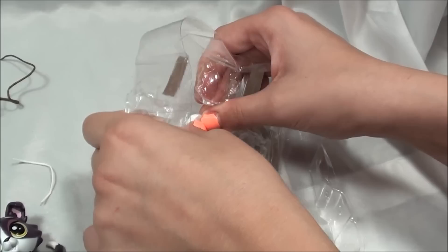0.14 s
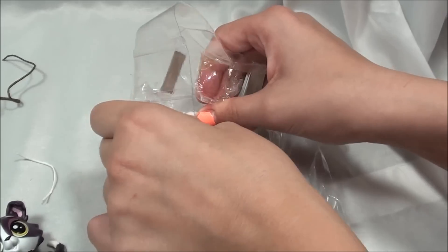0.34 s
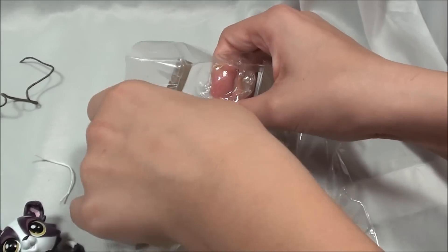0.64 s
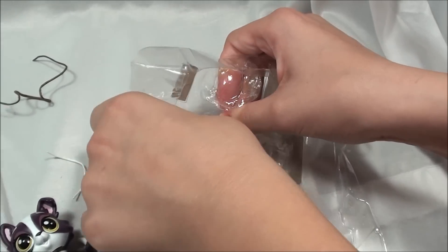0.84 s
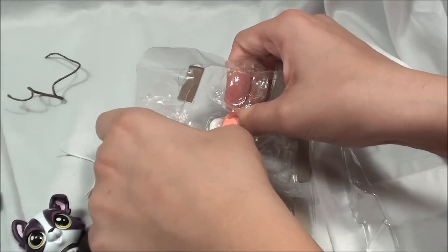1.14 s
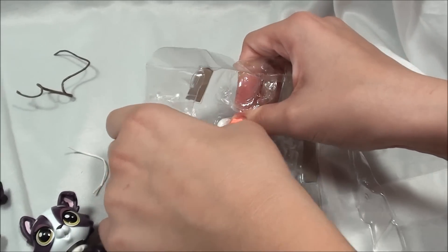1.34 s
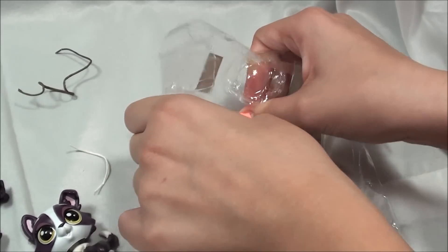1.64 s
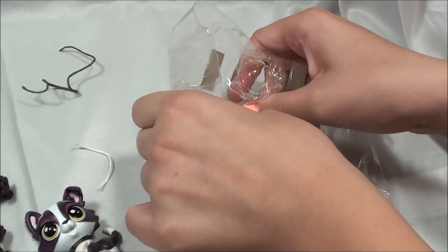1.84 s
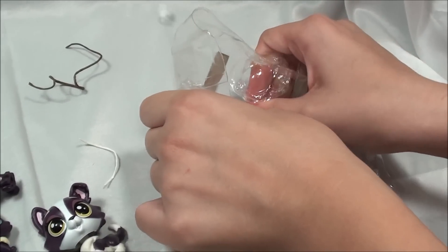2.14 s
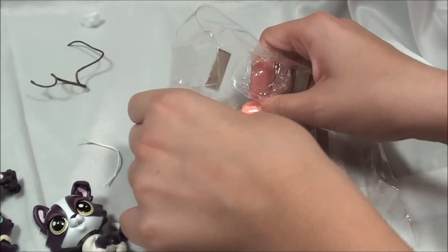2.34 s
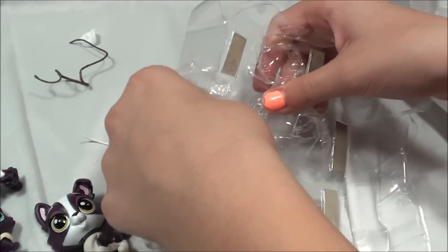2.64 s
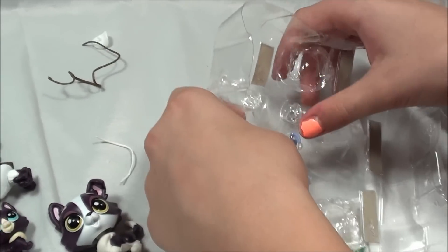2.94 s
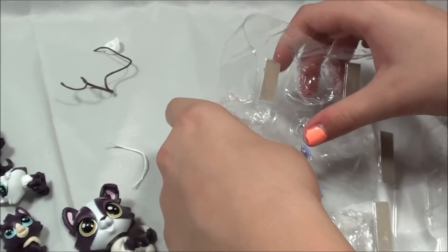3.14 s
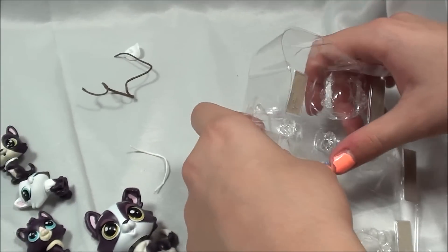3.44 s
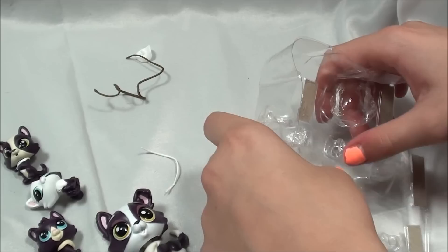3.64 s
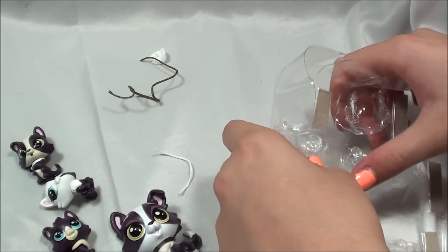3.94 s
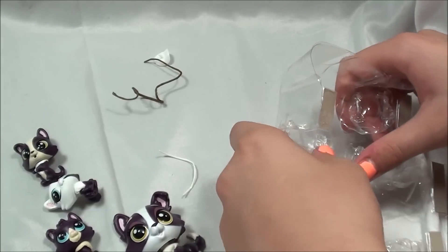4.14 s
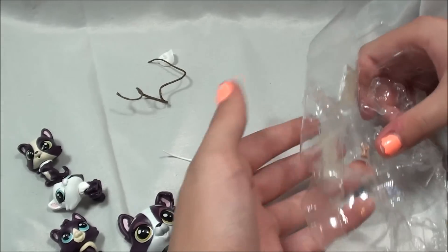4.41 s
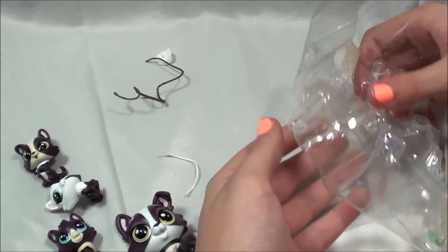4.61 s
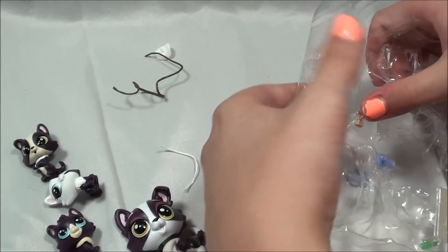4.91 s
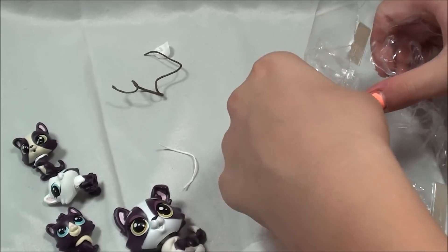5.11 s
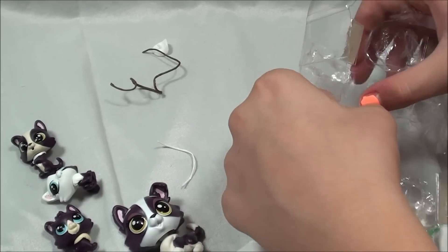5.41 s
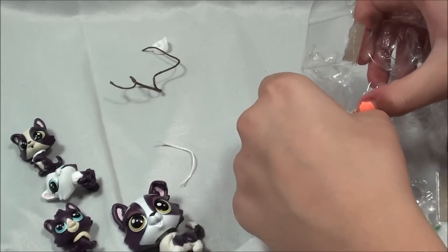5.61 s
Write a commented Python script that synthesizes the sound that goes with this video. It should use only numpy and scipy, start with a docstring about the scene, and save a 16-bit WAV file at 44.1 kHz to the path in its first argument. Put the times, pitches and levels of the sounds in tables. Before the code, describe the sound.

Hands handle a thin moulded plastic tray close to the microphone. It opens at once with a crisp crinkle, then irregular dry snaps, several per tenth of a second, bright and thin, mixed with hollow mid-pitched pops as cup walls flip. A short low creak of finger on taut plastic comes at 0.1-0.2 s, another at 1.6-1.75, a faster one at 2.2-2.3. Snapping eases a little around 1.1-1.3, then is dense and loud from 1.5 to 2.85, with strong pops near 2.5 and 2.65. From 2.9 to 4.3 only sparse clicks and soft rustle remain, one sharp snap at 3.14. At 4.35-4.5 a loud cluster of pops and crunch ends with a dull cloth-muffled bump. Near quiet follows, with a soft knock at 5.17, then small bright ticks from 5.5 to the end. Room echo is faint; steady low air, hiss and weak mains hum lie beneath.

```python
"""Small items worked out of a plastic tray

Hands work items out of a thin moulded tray indoors: noise bursts make the snapping creases, popping cups
and bumps on a cloth-covered table. A sliding finger creaks as uneven slips ring the taut wall, and tiny
noise grains rustle between. Shaped noise and low sine tones make room air, microphone hiss and mains hum."""
import sys
import numpy as np
from scipy import signal
from scipy.fft import rfft, irfft, next_fast_len
from scipy.io import wavfile
from scipy.ndimage import uniform_filter1d, minimum_filter1d, map_coordinates

SR = 44100
rng = np.random.default_rng(int(sys.argv[2]) if len(sys.argv) > 2 else 0)


def master(y):
    """Save y as 16-bit WAV."""
    cut = np.clip(np.atleast_2d(y).T, -1, 1)
    pcm = np.round(cut * 32767)  # scale
    wavfile.write(sys.argv[1], SR, pcm.astype(np.int16))


def magnitude_from_level(level_db):
    """Linear magnitude for a level in decibels (20 dB per decade)."""
    exponent = np.asarray(level_db, float) / 20
    return 10 ** exponent


N = 254456
CLOCK = np.arange(N) / SR  # seconds

# creases buckling: t/s, level/dB, ring f/Hz, sizzle level relative to the crack/dB
CREASE_SNAPS = [(0.0094, -8, 6790, -8), (0.019, -20, 4160, -10), (0.0247, -9, 6780, -1),
                (0.0293, -6.5, 5500, -16), (0.0422, -13, 5500, -9), (0.0464, -9.5, 5440, -7),
                (0.0653, -11.5, 7600, -7), (0.101, -20, 4630, -10), (0.1052, -15, 9300, -12),
                (0.1491, -16, 3920, -16), (0.158, -13, 3840, -13), (0.171, -7, 7310, -14),
                (0.176, -2.5, 7400, -21), (0.1994, -14, 5570, -15), (0.2109, -14, 3770, -3),
                (0.2289, -25, 3800, -8), (0.2443, -17, 3940, -1), (0.2563, -4, 4170, -6),
                (0.2838, -10.5, 9300, -11), (0.2939, -16, 8980, -13), (0.3062, -3, 8140, -39),
                (0.3182, 0.5, 5900, -38), (0.3726, -19, 5300, -4), (0.3945, -14, 4340, -17),
                (0.403, -13.5, 4430, -15), (0.4249, -17, 5960, -18), (0.4444, -3, 3570, -42),
                (0.4793, -15, 6870, -18), (0.5013, -18.5, 3710, 6), (0.5212, -9.5, 7950, -8),
                (0.5686, -10, 6800, 6), (0.5788, -15, 7600, -18), (0.5947, -19, 3840, -21),
                (0.6365, -27, 3620, -14), (0.6492, -14, 7750, -2), (0.6709, -1.5, 6300, -16),
                (0.6909, -8.5, 8830, -14), (0.7, -14, 9120, -15), (0.7056, -11, 8790, -7),
                (0.7133, -2, 5350, -9), (0.7382, -12.5, 6340, -7), (0.845, -12.5, 6400, -3),
                (0.8714, -2, 7100, -20), (0.8864, -24, 4060, -18), (0.9088, -19.5, 3160, -17),
                (0.9412, -15.5, 3730, -19), (0.9453, -12, 8650, -13), (0.9524, -17, 3280, -14),
                (1.0021, -16, 4380, -11), (1.0224, -17.5, 4330, -16), (1.049, -22, 8900, -18),
                (1.062, -11.5, 3320, -27), (1.0834, -5.5, 8100, -14), (1.1707, -10.5, 7200, -15),
                (1.2096, -18.5, 3840, -29), (1.2965, -10, 3780, -9), (1.2994, -7, 4180, -21),
                (1.3067, -12, 3720, -25), (1.3428, -10.5, 4930, -22), (1.3743, -15.5, 8140, -18),
                (1.3992, -11, 4750, -17), (1.4213, -15.5, 3220, -12), (1.4571, -10, 6250, -4),
                (1.4885, -13.5, 8600, -25), (1.5065, -20, 8750, -21), (1.5189, -1, 3560, -7),
                (1.5359, -5, 3500, -20), (1.5633, 0, 4020, -31), (1.5874, -17, 7520, -8),
                (1.6327, -13.5, 8240, -4), (1.6506, -7, 8640, 0), (1.7175, -14, 5960, -23),
                (1.7462, -10, 8100, -19), (1.7684, -7.5, 3980, -18), (1.782, -9.5, 4240, -23),
                (1.7913, -12, 3560, -16), (1.8103, -10.5, 4400, -18), (1.8267, -12, 5170, -20),
                (1.833, -17, 5200, -17), (1.8462, -7.5, 5010, -15), (1.8856, -6, 4400, -2.5),
                (1.8984, -10.5, 3400, -15), (1.91, -14.5, 9000, -12), (1.9197, -6.5, 4200, -19),
                (1.945, -21, 7900, -4), (1.9744, -11, 3260, -19), (1.9846, -10.5, 5290, -17),
                (2.0073, -6.5, 7140, -20), (2.0218, -13, 7090, -18), (2.0657, -1, 6500, -18),
                (2.0916, -15, 4310, -17), (2.1151, -8, 5460, -10), (2.1301, 1, 8300, -17),
                (2.146, -2.5, 6530, -17), (2.173, -12, 6700, -22), (2.1829, -9.5, 6900, -15),
                (2.1944, -17, 7850, -18), (2.1994, -18, 4120, -8), (2.2228, -6, 2870, 4.5),
                (2.2712, -13.5, 3620, 3), (2.3336, -22, 4260, -21), (2.3835, -13, 3010, -22),
                (2.393, -9.5, 7300, -20), (2.4034, -12, 8080, -16), (2.4269, -14, 3500, -18),
                (2.4454, -6, 7300, -13), (2.4553, -2.5, 7100, -19), (2.4777, -9, 7660, -3),
                (2.4813, -2, 8460, -19), (2.4966, -9, 7150, -17), (2.5411, 0, 3800, -29),
                (2.5745, -8, 7730, -17), (2.6338, -19.5, 3940, -7), (2.6589, -2.5, 7900, -11),
                (2.6908, -15.5, 6750, -22), (2.8, -13.5, 8150, -19), (2.8305, -0.5, 6400, -15),
                (2.8374, -10.5, 7700, -14), (2.9632, -19, 3160, -4), (3.0918, -19.5, 6400, -18),
                (3.1403, -2, 5900, 0.5), (3.2061, -20, 3730, -17), (3.3877, -22.5, 3050, 3),
                (3.4077, -30, 7310, -21), (3.5927, -15.5, 3900, 0.5), (3.7223, -29.5, 4200, -8),
                (3.8521, -22.5, 3220, -26), (3.9594, -14, 5230, -14), (3.9973, -25, 7360, -11),
                (4.0054, -22, 7460, -16), (4.0726, -24.5, 3560, -19), (4.1894, -19.5, 6600, -17),
                (4.326, -26, 6520, -20), (4.3665, -12, 3490, -12), (4.3869, -1, 7300, -25),
                (4.4164, -10, 3880, -22), (4.429, -14.5, 3060, -16), (4.4558, -5, 3140, -31),
                (4.4734, -15, 4210, -23), (4.5281, -10, 5870, -16), (4.7002, -32.5, 3500, -19),
                (4.8584, -33.5, 3800, -21), (4.9873, -32.5, 8400, -20), (5.02, -37, 6690, -1),
                (5.0499, -29, 9050, -19), (5.1193, -24.5, 5950, 2), (5.1721, -22, 3630, -21),
                (5.2864, -34, 5850, -20), (5.3862, -31.5, 8300, -4), (5.4989, -17, 9400, -14),
                (5.5184, -22, 8850, -9.5), (5.5298, -23.5, 8900, -13), (5.5602, -17, 6820, -9),
                (5.5672, -15.5, 8500, -18), (5.6138, -24.5, 8700, -9), (5.6554, -19.5, 8700, -14),
                (5.673, -23, 7200, -14), (5.684, -21.5, 8730, -14), (5.7049, -12.5, 2930, -12),
                (5.7172, -12.5, 6350, -21), (5.7402, -23, 3290, -9), (5.758, -27, 8850, -14)]
# hollow cups flipping: t/s, level before trims/dB, ring f/Hz
CUP_POPS = [(0.009, -10, 1870), (0.028, -24, 2010), (0.046, -22, 1950), (0.101, -20, 1850),
            (0.125, -21, 1250), (0.148, -21, 2010), (0.209, -4, 1430), (0.257, -16.5, 1500),
            (0.284, -26, 1680), (0.319, -13, 1650), (0.445, -7, 876), (0.467, -18.5, 864),
            (0.601, -15.5, 830), (0.616, -5.5, 1350), (0.636, -11.5, 890), (0.667, -15.5, 1850),
            (0.671, -18, 1530), (0.696, -20, 2440), (0.842, -21, 2580), (0.871, -19.5, 1980),
            (0.886, -20.5, 2460), (1.002, -23.5, 1670), (1.061, -24, 1470), (1.084, -20.5, 1235),
            (1.167, -13.5, 1600), (1.176, -9.5, 1610), (1.211, -23.5, 1830), (1.299, -9.5, 1480),
            (1.342, -22, 2580), (1.398, -17, 2380), (1.421, -25.5, 1770), (1.456, -18.5, 1800),
            (1.488, -16.5, 2120), (1.519, -15, 2600), (1.563, -17, 2680), (1.718, -24, 1600),
            (1.767, -20, 1500), (1.783, -15, 733), (1.827, -10, 1560), (1.858, -24, 720),
            (1.885, -16.5, 1600), (1.893, -18, 714), (1.923, -25, 1510), (1.974, -21, 1600),
            (2.007, -19.5, 1700), (2.097, -22.5, 845), (2.126, -11.5, 1490), (2.147, -14.5, 2100),
            (2.183, -19.5, 660), (2.202, -16.5, 2060), (2.223, -9, 1490), (2.307, -19, 1730),
            (2.333, -25, 2140), (2.373, -19, 1460), (2.383, -20, 2570), (2.392, -15.5, 2510),
            (2.434, -21, 2610), (2.482, -15, 1230), (2.496, -6, 653), (2.54, -3.5, 2800),
            (2.581, -12, 1480), (2.659, -5.5, 2720), (2.69, -22, 2270), (2.837, -9, 1430),
            (2.962, -25.5, 2630), (3.15, -14.5, 703), (3.174, -25, 1080), (3.206, -23, 1710),
            (3.228, -29, 1310), (3.356, -31, 2060), (3.388, -24, 1430), (3.593, -25, 2300),
            (3.705, -35.5, 905), (3.853, -28.5, 2000), (3.958, -27.5, 2330), (4.01, -25.5, 1970),
            (4.072, -21.5, 886), (4.188, -27, 2030), (4.236, -33, 2110), (4.366, -11.5, 2020),
            (4.387, -3.5, 2540), (4.411, -7.5, 2580), (4.44, -4.5, 1960), (4.45, -11, 1800),
            (4.461, -3, 1400), (5.045, -38, 573), (5.221, -31.5, 2050), (5.337, -32, 1870),
            (5.568, -26, 1980), (5.663, -31, 2690), (5.704, -16, 2640), (5.716, -24, 2270),
            (5.742, -32, 1570)]


def snaps():
    """Each crease lets go at once: a dry crack, strongest where that facet rings, and a thin sizzle."""
    s, db, ring_hz, sizzle_db = np.transpose(CREASE_SNAPS)
    # a fixed time plus 37 cycles of the ring, to fall by 60 dB
    t60 = np.clip(0.0044 + 37 / ring_hz, 0.003, 0.09)

    def crack_colour(hz):
        return hump(hz, ring_hz[:, None], 0.26) + 0.71 * hump(hz, 5120, 0.48)

    def sizzle_colour(hz):
        return hump(hz, 8700, 0.5)

    crack = bursts(s, db, t60, crack_colour, rise_s=0.0003, size=3072)
    sizzle = bursts(s, db + sizzle_db, 0.18 * t60, sizzle_colour, rise_s=0.00021, size=2048)
    return crack + sizzle


def pops():
    """A cup wall flips over: big cups ring clearly, small ones less purely and weaker; the lowest notes are cut
    away."""
    s, db, ring_hz = np.transpose(CUP_POPS)
    t60 = np.clip(0.0051 + 35 / ring_hz, 0.006, 0.12)
    small = np.clip(np.log2(ring_hz / 900), 0, 2)  # octaves of ring above a big cup

    def ring_colour(hz):
        return hump(hz, ring_hz[:, None], (0.06 + 0.04 * small)[:, None])

    def slap_colour(hz):
        return hump(hz, np.sqrt(1600 * ring_hz)[:, None], 0.71)

    ring = bursts(s, db - 3.5 - 1.2 * small, t60, ring_colour, rise_s=0.0006, size=4096)
    slap = bursts(s, db - 3.5, np.full(len(s), 0.028), slap_colour, rise_s=0.00046, size=4096)
    # three gentle bass cuts in a row
    return filtered(ring + slap, lambda hz: (1j * hz / (1j * hz + 330)) ** 3)


def bumps():
    """The tray meets the table, and cloth softens the contact: a dull low knock."""
    # knocks on the table: t/s, level/dB, f/Hz
    knocks = [(0.209, -41, 234), (0.337, -35.5, 150), (0.447, -44, 140), (0.879, -39, 252),
              (2.378, -43, 180), (2.54, -39, 168), (2.658, -38, 262), (3.084, -46, 200), (3.152, -35, 473),
              (4.384, -43, 243), (4.462, -29.5, 320), (4.469, -31.5, 135), (4.502, -31, 260),
              (5.171, -30.5, 394), (5.181, -38.5, 197), (5.496, -41, 348)]
    s, db, knock_hz = np.transpose(knocks)

    def knock_colour(hz):
        return hump(hz, knock_hz[:, None], 0.29)

    return bursts(s, db, np.full(len(s), 0.09), knock_colour, rise_s=0.0055, size=4096)


def creak():
    """A finger sticks and slips on taut plastic at an uneven rate; every slip rings the wall."""
    # one list of points per slide: t/s, relative level/dB, rate/slips per s
    slides = [
        [(.085, -61, 70), (.14, -34.5, 136), (.205, -40, 150)],
        [(1.61, -37, 110), (1.7, -45.5, 106), (1.755, -36, 160)],
        [(2.185, -35, 230), (2.25, -37, 310), (2.32, -39.5, 196)],
    ]
    # resonances of the taut wall: f/Hz, width/Hz, relative level/dB
    resonances = [(1620, 380, 3), (3780, 3500, -4.5), (6800, 810, -16)]
    slips = np.zeros(N)
    for rows in slides:
        s, db, rate = np.transpose(rows)
        sliding = (CLOCK > s[0]) & (CLOCK < s[-1])
        speed = np.interp(CLOCK, s, rate) * sliding
        # one slip each time the running count passes a whole number
        at = np.flatnonzero(np.diff(np.floor(np.cumsum(speed) / SR)))
        chance = rng.standard_normal((len(at), 2))
        at = at + (0.08 * chance[:, 0] * SR / speed[at]).astype(int)
        strength = magnitude_from_level(np.interp(at / SR, s, db) + 1.5 * chance[:, 1])
        # fewer slips per second are each made stronger, to hold the level
        slips[at] = strength * np.sqrt(SR / np.interp(at / SR, s, rate))

    def resonance(hz, centre_hz, width_hz):
        damping = 1j * hz * width_hz
        return damping / (centre_hz * centre_hz - hz * hz + damping)

    def wall_response(hz):
        return sum(magnitude_from_level(db) * resonance(hz, centre_hz, width_hz) ** 2
                   for centre_hz, width_hz, db in resonances)

    return magnitude_from_level(15.5) * filtered(slips, wall_response)


def film_rustle():
    """Thin plastic rustles under the hands and after each snap; gentle touches hiss more and tick less."""
    # colour of the thin plastic: f/Hz, relative level/dB per Hz
    film_colour = [(1180, -7.5), (2000, -3.5), (2200, -5), (2400, -11), (4050, 5.5), (7570, -1.5),
                   (14500, -12.5), (16000, -35)]
    moved = magnitude_from_level(handling(column=1)) + crumpling(column=2)
    level = np.hypot(moved, settling(CREASE_SNAPS, under_db=-22.5, t60=0.075))
    gentle = np.clip((-36 - 20 * np.log10(level)) / 10, 0, 1)
    return level * rustle(film_colour, [2500, 13000], count=3000, t60=0.012, spread_db=3.5,
                          width=0.42, hiss=0.22 + 1.47 * gentle)


def hollow_rustle():
    """The hollow cups give a lower rustle under the hands and after each pop."""
    # colour of the hollow cups: f/Hz, relative level/dB per Hz
    hollow_colour = [(90, -13), (180, 1), (320, -7.5), (500, -7), (800, -6), (1600, -7.5), (2300, -9),
                     (3000, -13), (5000, -43)]
    moved = magnitude_from_level(handling(column=2)) + crumpling(column=3)
    level = np.hypot(moved, settling(CUP_POPS, under_db=-20, t60=0.15))
    return level * rustle(hollow_colour, [700, 2600], count=2000, t60=0.025, spread_db=3.5,
                          width=0.72, hiss=0.43)


def rustle(spectrum, span_hz, count, t60, spread_db, width, hiss):
    """Many tiny creases of unequal size, each with its own colour, over the hiss of skin on plastic."""
    draw = rng.random((count, 3))
    low, high = np.log(span_hz)
    centre_hz = np.exp(low + (high - low) * draw[:, 1:2])
    sizes_db = -spread_db * np.log(draw[:, 2] + 0.01)
    grains = bursts(draw[:, 0] * N / SR, sizes_db, np.full(count, t60),
                    lambda hz: hump(hz, centre_hz, width), rise_s=0.0003, size=512)
    # grains spread evenly on log frequency fall 3 dB an octave until levelled
    grains = unit(filtered(grains, np.sqrt))
    mixed = (grains + hiss * rng.standard_normal(N)) / np.sqrt(1 + hiss ** 2)
    return unit(filtered(mixed, lambda hz: magnitude_from_level(along(spectrum, hz))))


def handling(column):
    """Rustle level in dB as the hands move; fingers never move evenly, so it wavers at random."""
    # hand movement, before the wavering: t/s, film rustle level/dB, hollow rustle level/dB
    movement = np.transpose([(0, -46, -46), (.25, -34, -37), (.55, -45, -41.5), (.75, -36.5, -48.5),
                             (.95, -47.5, -45.5), (1.2, -45.5, -56), (1.45, -55, -58), (1.55, -40.5, -49),
                             (1.9, -47.5, -50), (2.35, -46, -45.5), (2.75, -43.5, -49.5), (3.2, -41, -48),
                             (3.5, -50, -51), (3.85, -45.5, -53.5), (4.25, -46.5, -50.5), (4.6, -52.5, -61),
                             (5.05, -53.5, -59), (5.38, -40.5, -49), (5.77, -53, -58)])
    waver_db = 2.5 * map_coordinates(rng.standard_normal(150), [25 * CLOCK])  # 25 random points a second
    return np.interp(CLOCK, movement[0], movement[column]) + waver_db


def crumpling(column):
    """A squeeze crumples a whole patch: rustle amplitude with a quick rise, a hold and a release."""
    # squeezes: start t/s, length/s, film rustle level/dB, hollow rustle level/dB
    squeezes = [(0, 0.028, -18.5, -47), (0.137, 0.24, -34, -44), (0.324, 0.054, -26.5, -35),
                (0.58, 0.11, -37, -48), (0.837, 0.14, -43.5, -53), (1.041, 0.058, -51, -42.5),
                (1.169, 0.068, -46.5, -40.5), (1.308, 0.12, -51, -45), (1.51, .07, -44, -52),
                (1.756, 0.094, -38, -42), (1.889, 0.042, -32, -30), (2.013, 0.023, -36, -39),
                (2.184, 0.13, -31, -43.5), (2.369, .14, -26.5, -45.5), (2.53, 0.14, -35, -41),
                (2.819, 0.035, -40, -38.5), (3.301, 0.045, -47, -51), (3.991, 0.028, -44, -44),
                (4.131, 0.063, -66, -49), (4.308, 0.16, -38.5, -46), (4.364, 0.046, -27.5, -28.5),
                (4.437, 0.052, -25, -23), (4.49, 0.059, -51, -46.5), (4.689, .05, -49.5, -56),
                (5.16, 0.032, -44, -39), (5.644, 0.054, -44, -64)]
    squeeze_s, let_go_s = 0.01, 0.035  # time to rise and to fall by 60 dB
    power = np.zeros(N)
    for row in squeezes:
        rise_db = 60 * np.minimum(CLOCK - row[0], 0) / squeeze_s
        fall_db = -60 * np.maximum(CLOCK - row[0] - row[1], 0) / let_go_s
        power += magnitude_from_level(np.maximum(row[column] + rise_db + fall_db, -150)) ** 2
    return np.sqrt(power)


def settling(rows, under_db, t60):
    """Rustle amplitude stirred up by each snap or pop, dying away after it."""
    s, db = np.transpose(rows)[:2]
    kicks = np.bincount(np.round(s * SR).astype(int), magnitude_from_level(db) ** 2, N)[:N]
    fade = magnitude_from_level(-60 * CLOCK[:SR // 2] / t60) ** 2
    power = np.abs(signal.fftconvolve(kicks, fade)[:N])
    return magnitude_from_level(under_db) * np.sqrt(power)


def after_ring(tray):
    """The tray's own sheet keeps ringing briefly after each sound."""
    # decay of the plastic sheet: f/Hz, time to fall by 60 dB/s
    sheet_decay = [(300, 0.056), (850, 0.11), (2000, 0.012), (6000, 0.07), (14000, 0.0022)]
    return magnitude_from_level(-15.0) * tail(tray, sheet_decay, delay_s=0.001442)


def room(tray):
    """The room answers faintly, its low notes lasting longest."""
    # decay of the room: f/Hz, time to fall by 60 dB/s
    room_decay = [(300, 0.97), (1500, 0.14), (4000, 0.11), (10000, 0.037)]
    return magnitude_from_level(-30.5) * tail(tray, room_decay, delay_s=0.011)


def background():
    """Steady air and hiss, alike in both channels only at the extremes, with slightly unsteady mains hum."""
    # colour of room air and hiss: f/Hz, relative level/dB per Hz
    air_colour = [(15, -40), (25, -24), (63, -6), (187, -0.5), (240, 0.5), (617, -2), (1180, -8.5),
                  (1930, -7), (3230, -14), (8140, -20), (15700, -15), (16400, -32)]
    # left-right likeness of the air: f/Hz, likeness/0-1
    likeness = [(60, 0.8), (180, 0.52), (550, 0.07), (1650, 0), (5000, 0), (15000, 1)]
    # mains hum tones: f/Hz, relative level/dB
    hum_tones = [(59.2, -67), (118.4, -67.5), (177.6, -69)]

    def mid_side(hz):
        turn = np.arccos(np.clip(along(likeness, hz), 0, 1)) / 2
        return magnitude_from_level(along(air_colour, hz)) * [np.cos(turn), np.sin(turn)]

    mid, side = filtered(rng.standard_normal((2, N)), mid_side)
    air = magnitude_from_level(-53) * unit(np.array([mid + side, mid - side]))
    waver = magnitude_from_level(map_coordinates(rng.standard_normal(60), [8 * CLOCK]))
    hum = sum(magnitude_from_level(db + 5.5) * np.sin(2 * np.pi * hz * CLOCK) for hz, db in hum_tones)
    return air + waver * hum


def bursts(s, peak_db, t60, colour, rise_s, size):
    """One noise burst per row with its own colour and decay; sudden release excites every mode at once."""
    t = np.arange(size) / SR
    hz = np.fft.rfftfreq(size, 1 / SR) + 1
    noise = irfft(rfft(rng.standard_normal((len(s), size))) * colour(hz), size)
    shape = magnitude_from_level(-60 * t / t60[:, None]) * (1 - np.exp(-t / rise_s))
    shape = shape / shape.max(axis=1, keepdims=True)
    wave = noise * shape
    # as much energy as a tone of this peak level under the same shape
    gain = magnitude_from_level(peak_db) * np.linalg.norm(shape, axis=1) / np.linalg.norm(wave, axis=1) / np.sqrt(2)
    onset_delay_s = 0.27 / 343  # each burst starts slightly later than its listed time, less its rise
    start = np.round(np.maximum(s + onset_delay_s - rise_s, 0) * SR).astype(int)
    at = start[:, None] + np.arange(size)
    return np.bincount(at.ravel(), (wave * gain[:, None]).ravel(), N + SR)[:N]


def tail(x, decay, delay_s):
    """A diffuse answer, different in each channel, each frequency dying at its own speed."""
    hz, t, z = signal.stft(rng.standard_normal((2, SR // 3)), SR, nperseg=64)
    fading = magnitude_from_level(-60 * t / along(decay, hz)[:, None])
    answer = signal.istft(z * fading, SR, nperseg=64)[1]
    late = np.pad(x, (round(delay_s * SR), 0))[None]
    return signal.fftconvolve(late, answer / np.linalg.norm(answer[0]), axes=1)[:, :N]


def hump(hz, centre_hz, width):
    """A smooth spectral hump, width in natural-log units."""
    return np.exp(-0.5 * (np.log(hz / centre_hz) / width) ** 2)


def unit(x):
    """Scaled to rms 1."""
    return x / np.sqrt(np.mean(x ** 2) + 1e-20)


def along(points, hz):
    """Reads between (Hz, value) points on a log frequency axis."""
    f, v = np.transpose(points)
    return np.interp(np.log(hz + 1), np.log(f + 1), v)


def filtered(x, response):
    """Reshapes the spectrum of x by a response that depends on frequency."""
    m = next_fast_len(N + 8192)
    return irfft(rfft(x, m) * response(np.fft.rfftfreq(m, 1 / SR)), m)[..., :N]


def scene():
    """The tray leans to the right by a changing amount as the hands move it, over the background."""
    tray = snaps() + pops() + bumps() + creak() + film_rustle() + hollow_rustle()
    heard = tray + after_ring(tray) + room(tray)
    # left level minus right level, in dB
    pan_db = np.interp(CLOCK, [0, 3, 4.2, 5.77], [-0.44, -1.0, -2.0, -0.98])
    return heard * magnitude_from_level([pan_db / 2, -pan_db / 2]) + background()


def roll_off(x):
    """The treble ends steeply here."""
    return signal.sosfilt(signal.butter(12, 16820, fs=SR, output="sos"), x)


def record(dry):
    """The microphone drops deep bass and dips near 5 kHz; a fast limiter holds peaks at full scale."""
    def microphone(hz):
        treble_end = hz < 16700
        dip = 1 - 0.54 * hump(hz + 1, 4930, 0.3)
        bass_cut = 1 / np.sqrt(1 + (40 / (hz + 1)) ** 4)
        return treble_end * dip * bass_cut

    heard = filtered(dry, microphone)
    needed = 1 / np.maximum(np.abs(heard).max(axis=0), 1)
    # the gain drops just ahead of a peak and moves smoothly; sizes in samples
    gain = uniform_filter1d(minimum_filter1d(needed, size=65), size=64)
    return roll_off(heard * gain)


dry = scene()
out = record(dry)
master(out)
```